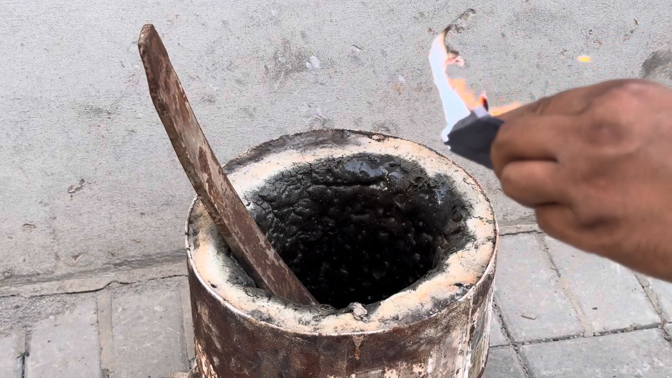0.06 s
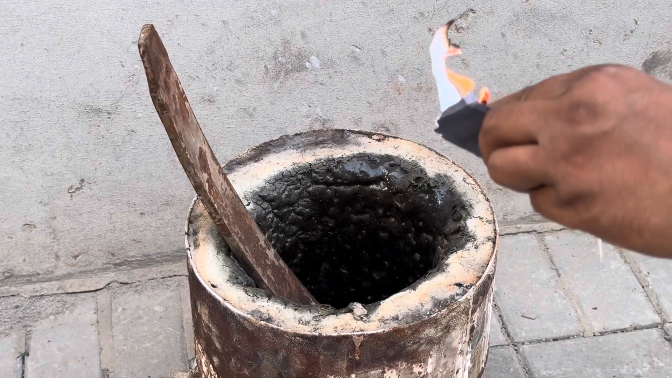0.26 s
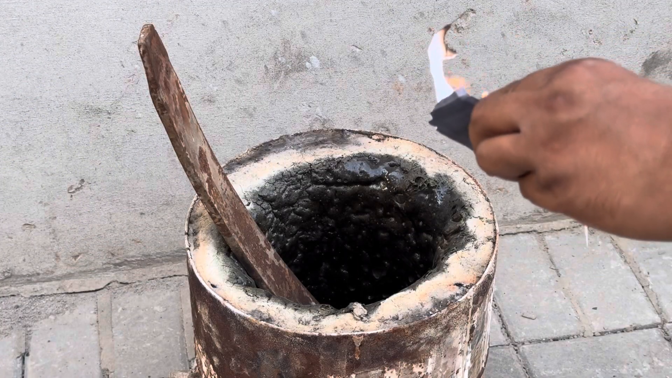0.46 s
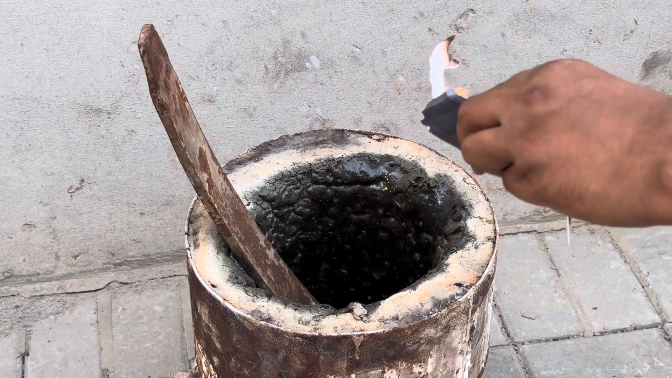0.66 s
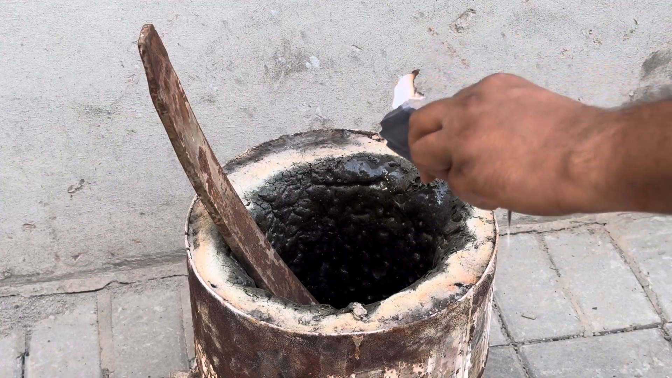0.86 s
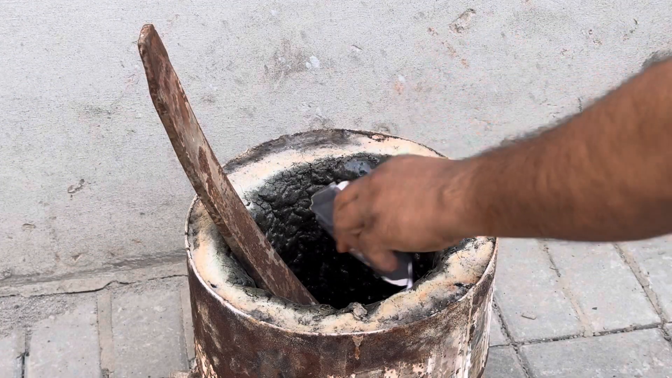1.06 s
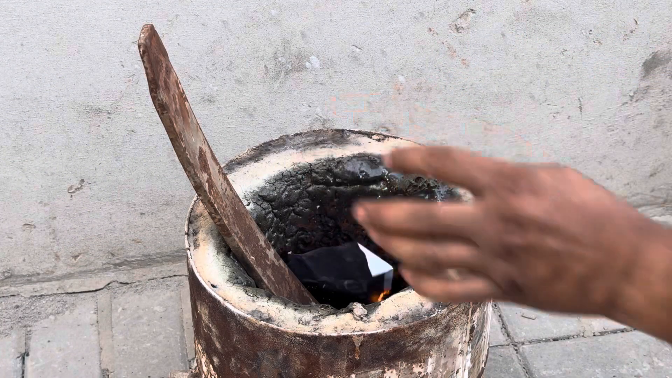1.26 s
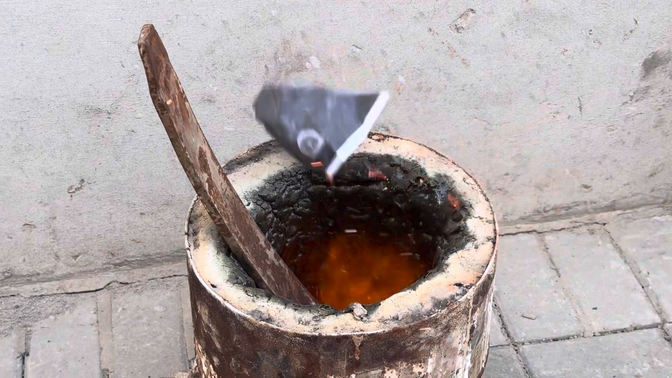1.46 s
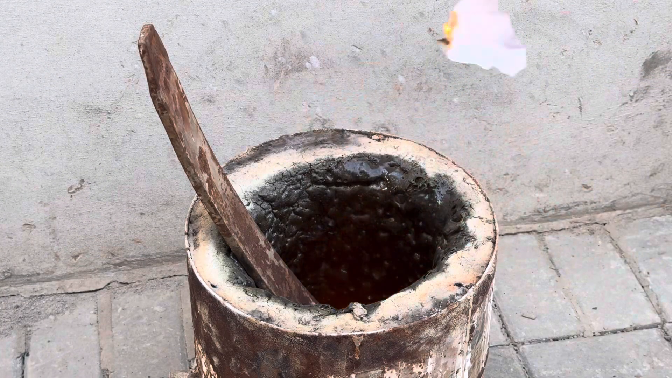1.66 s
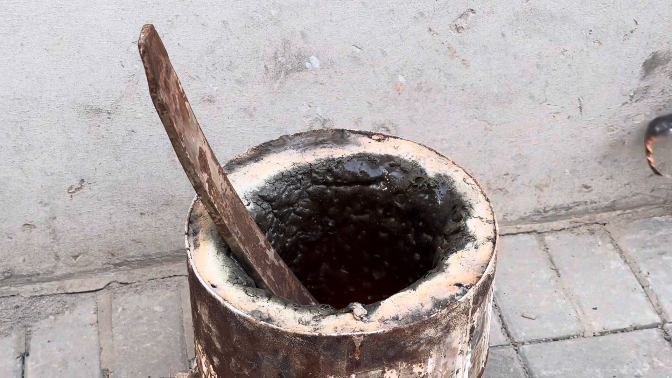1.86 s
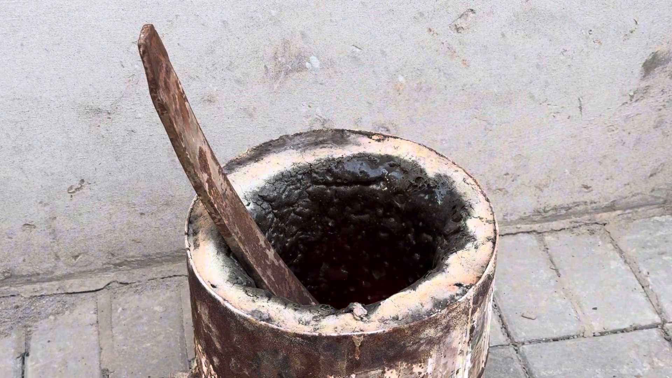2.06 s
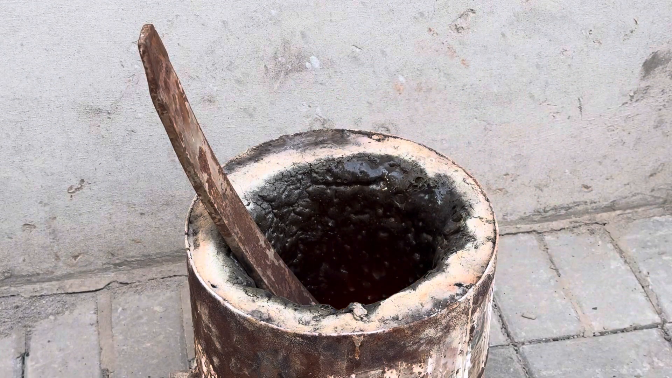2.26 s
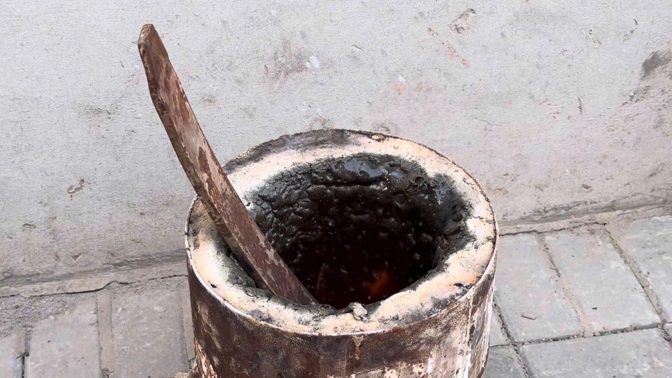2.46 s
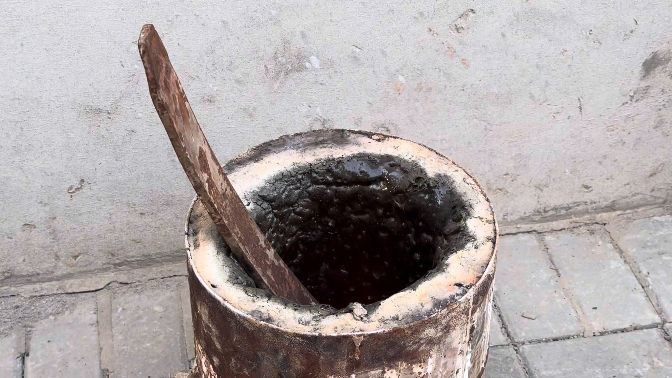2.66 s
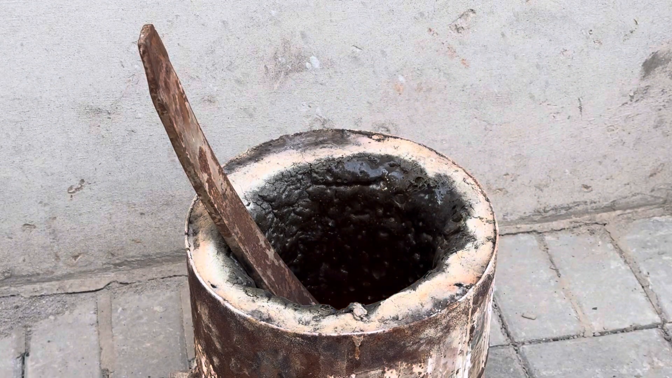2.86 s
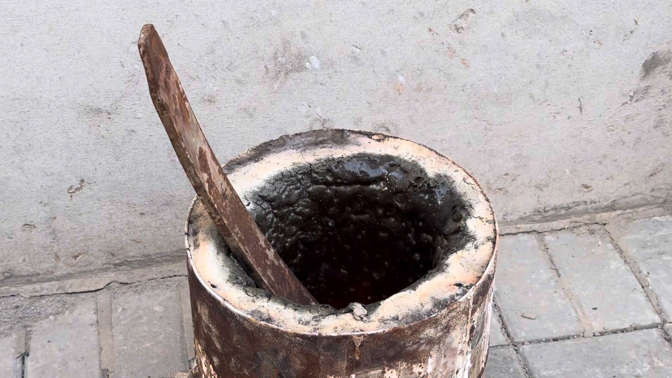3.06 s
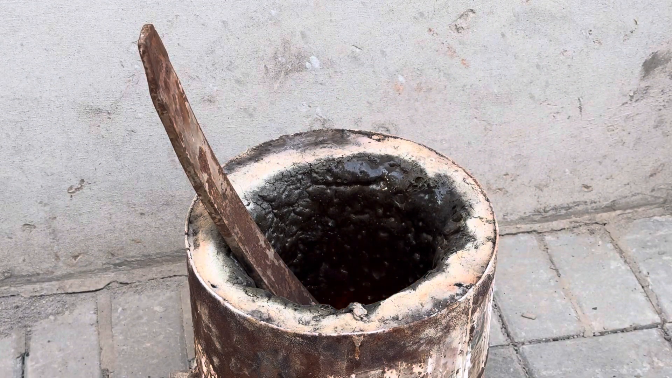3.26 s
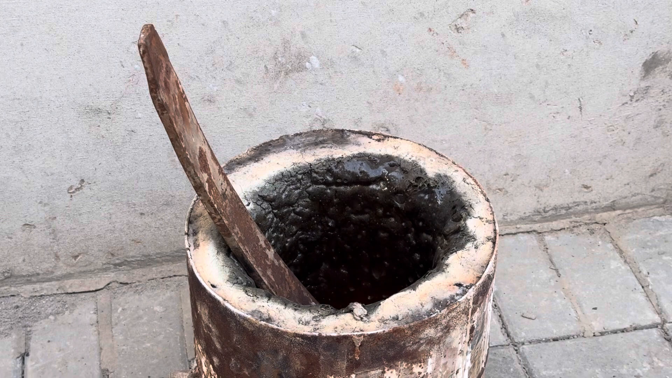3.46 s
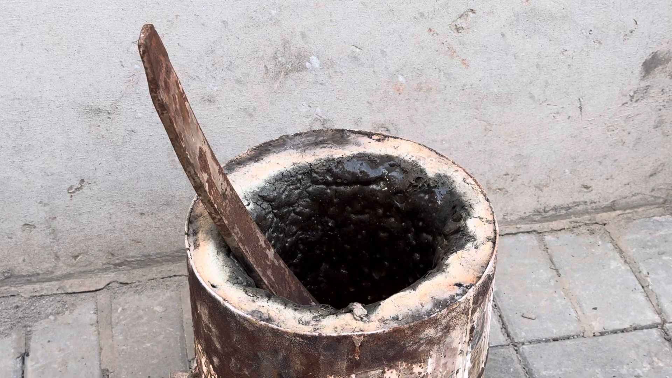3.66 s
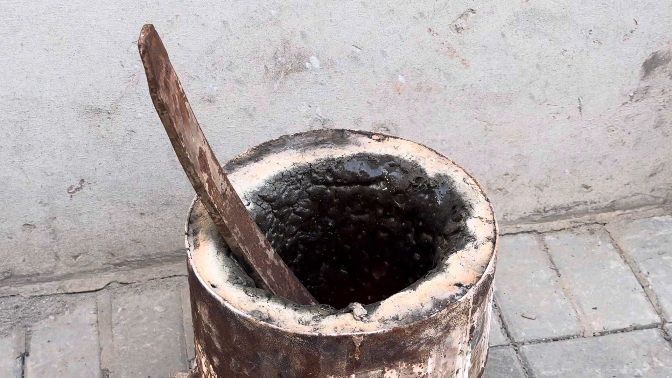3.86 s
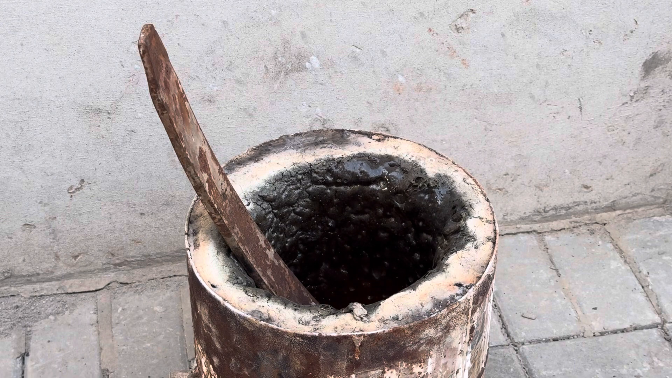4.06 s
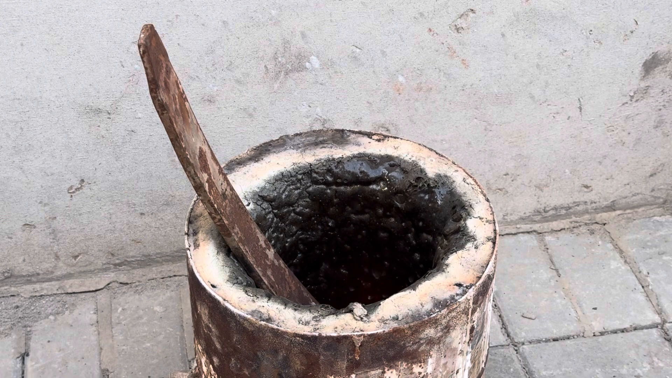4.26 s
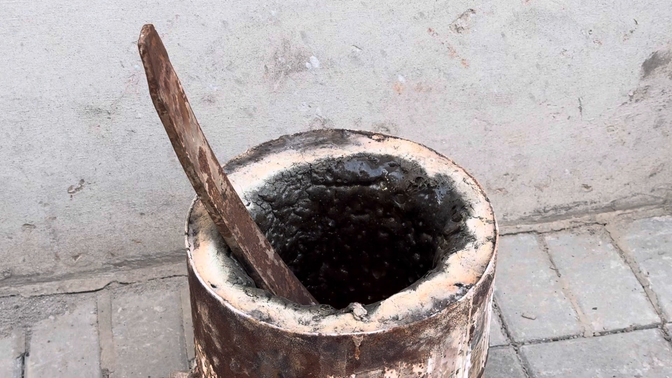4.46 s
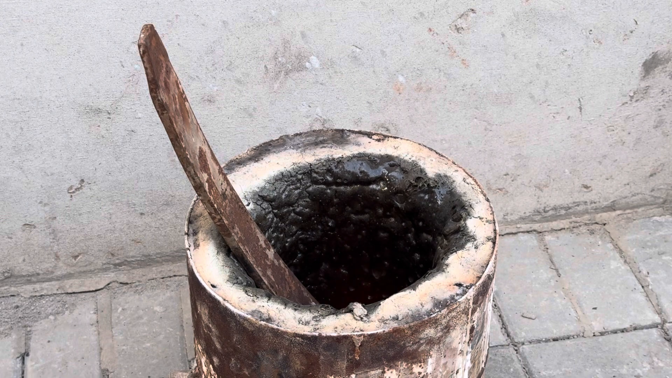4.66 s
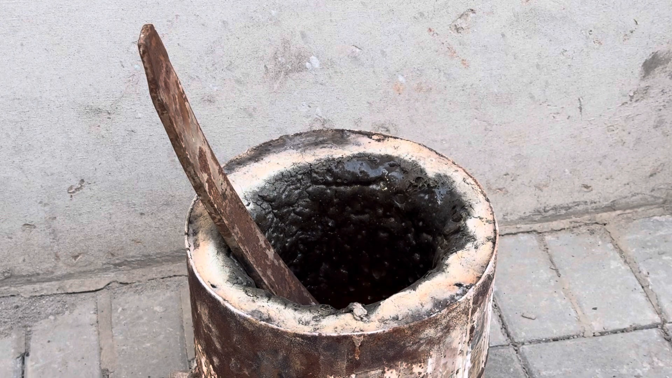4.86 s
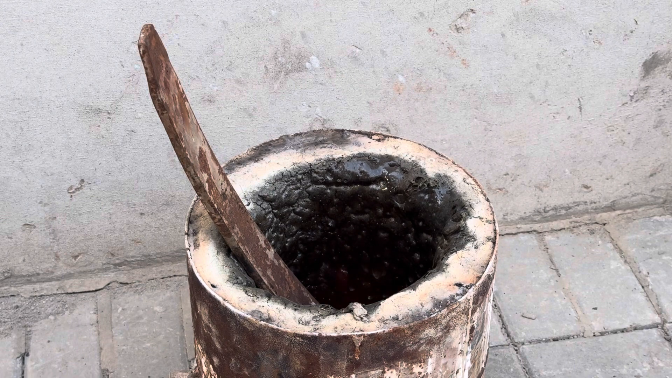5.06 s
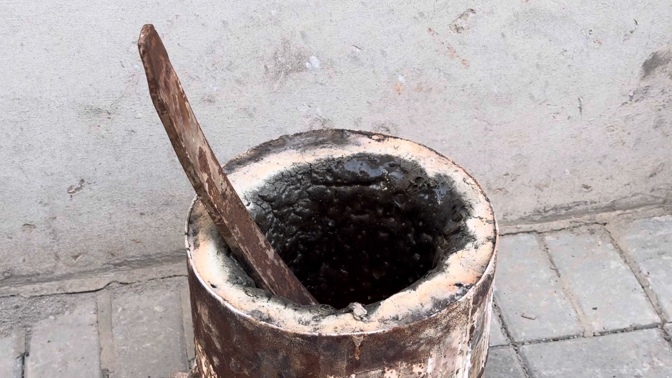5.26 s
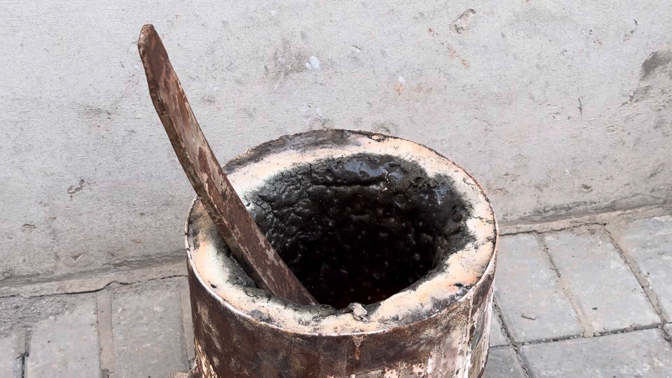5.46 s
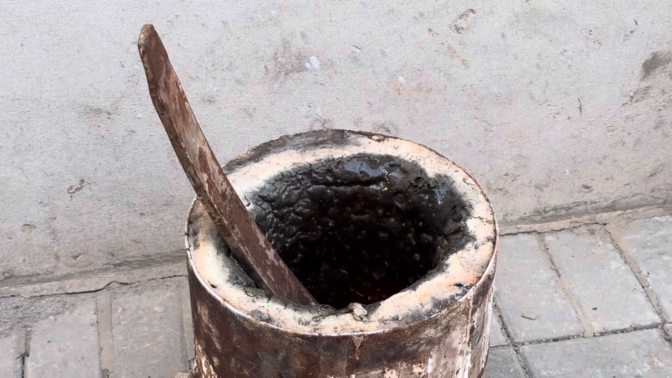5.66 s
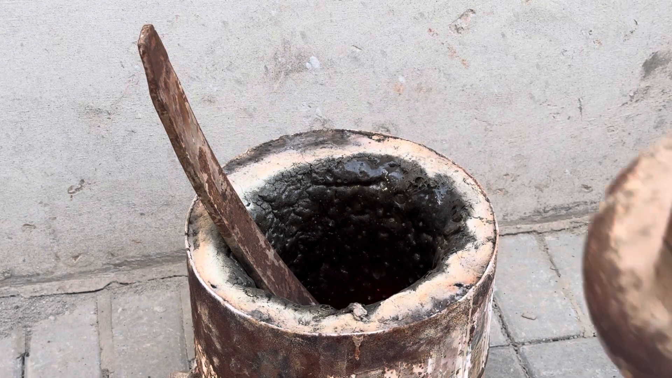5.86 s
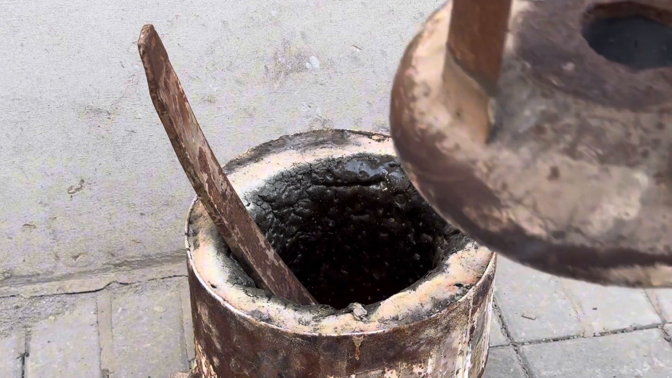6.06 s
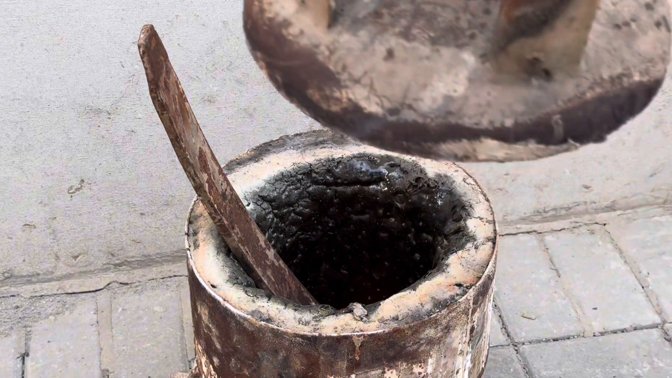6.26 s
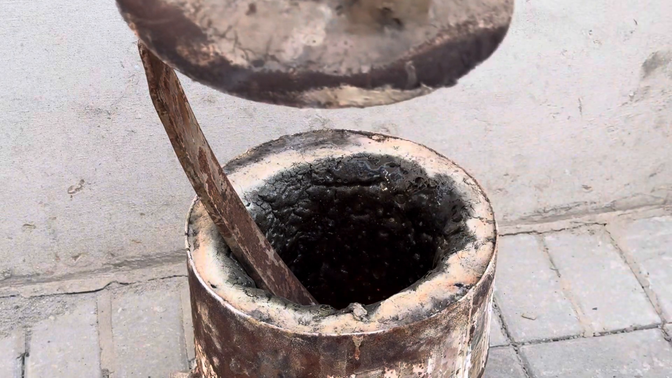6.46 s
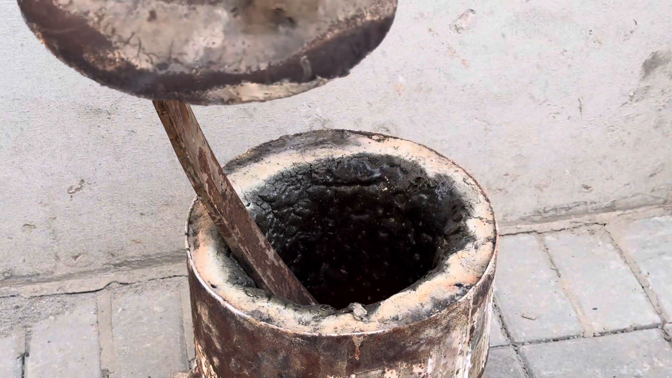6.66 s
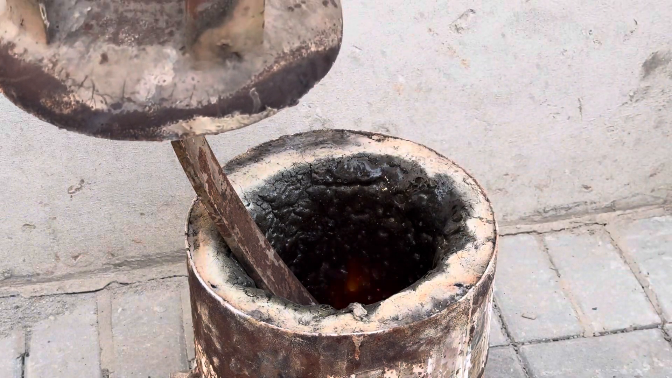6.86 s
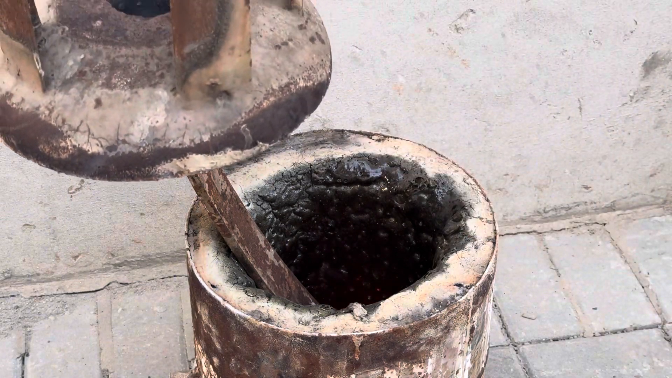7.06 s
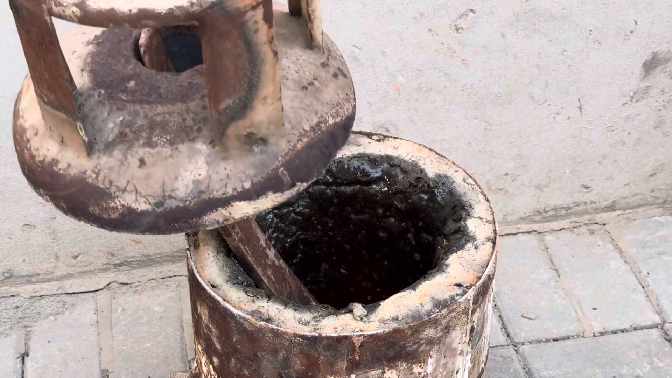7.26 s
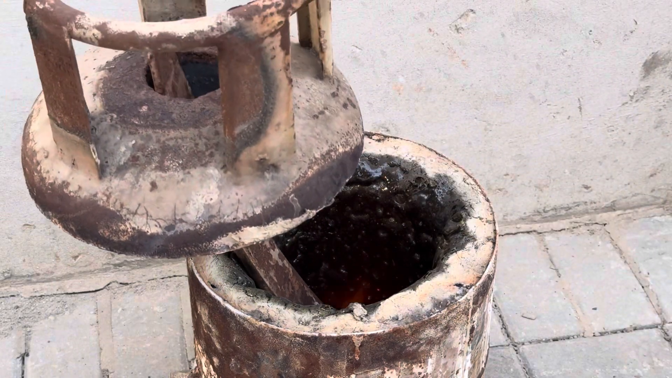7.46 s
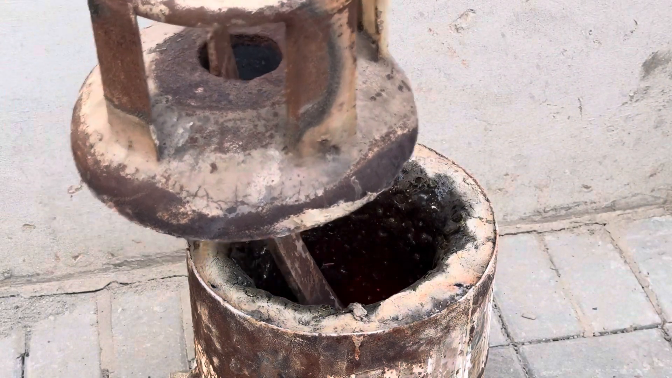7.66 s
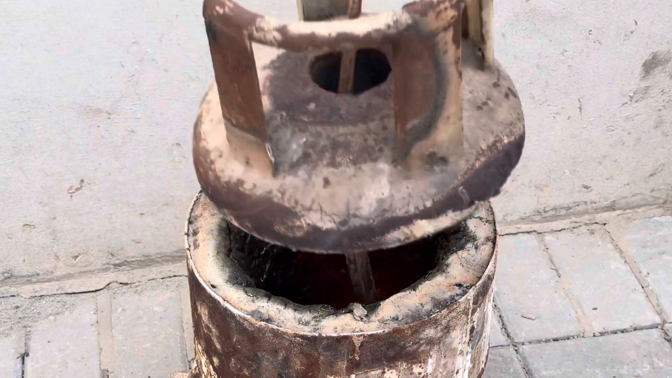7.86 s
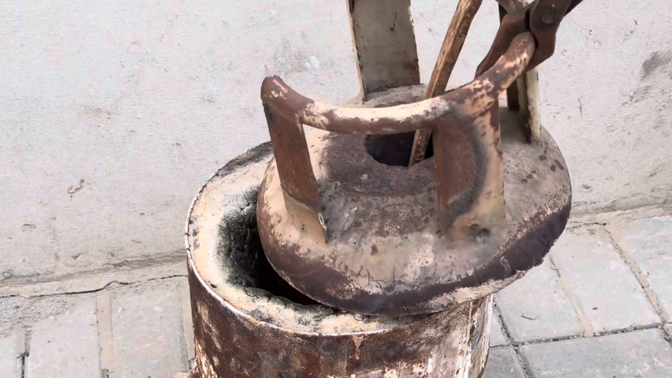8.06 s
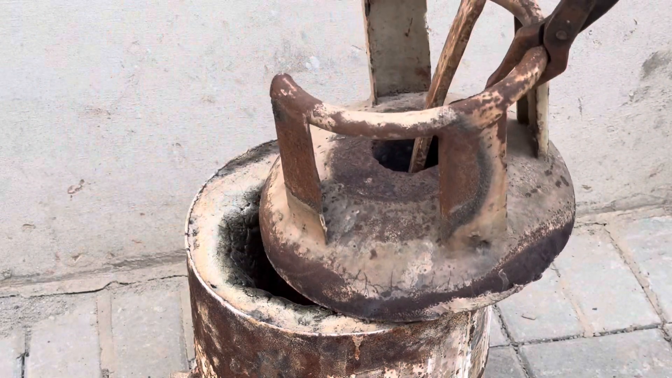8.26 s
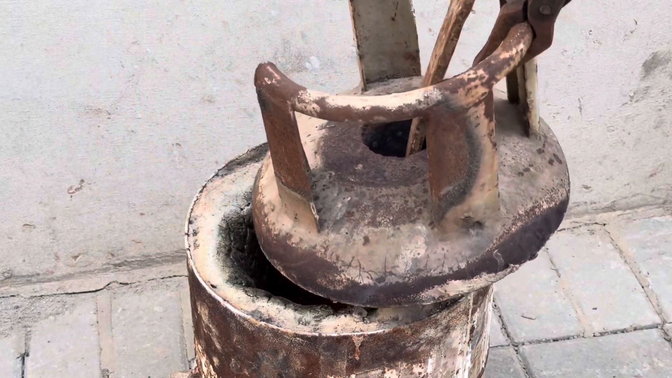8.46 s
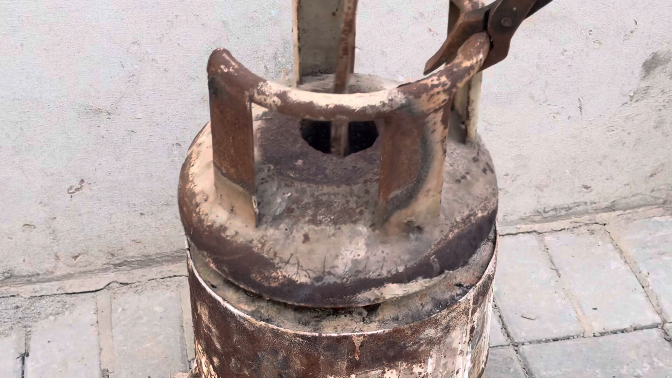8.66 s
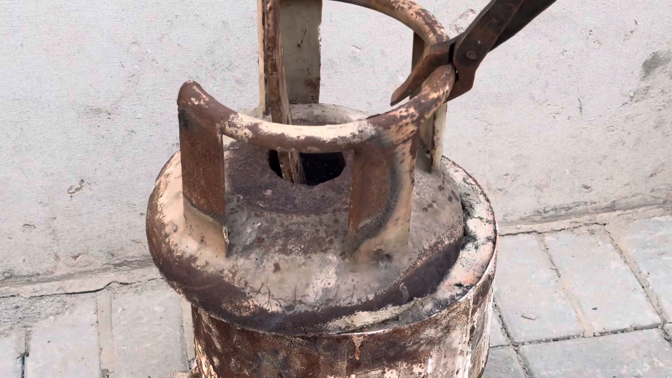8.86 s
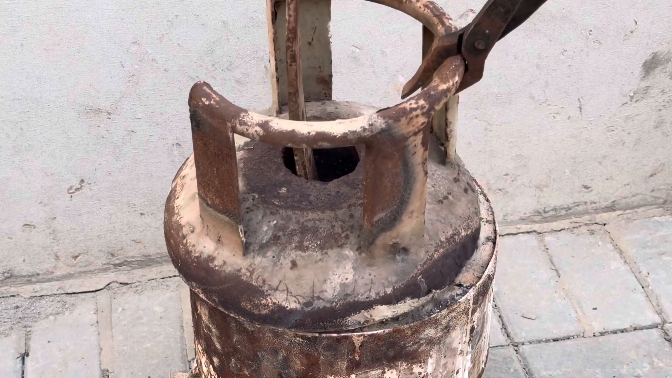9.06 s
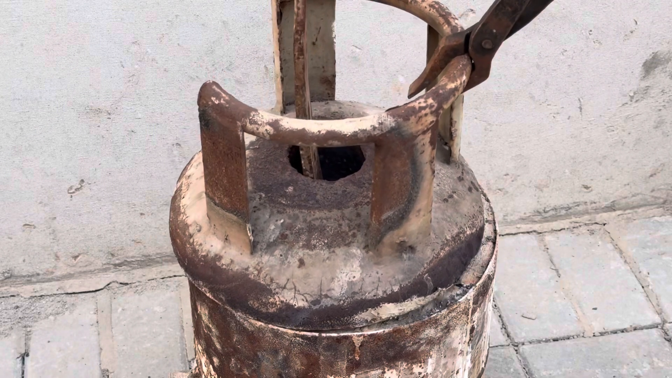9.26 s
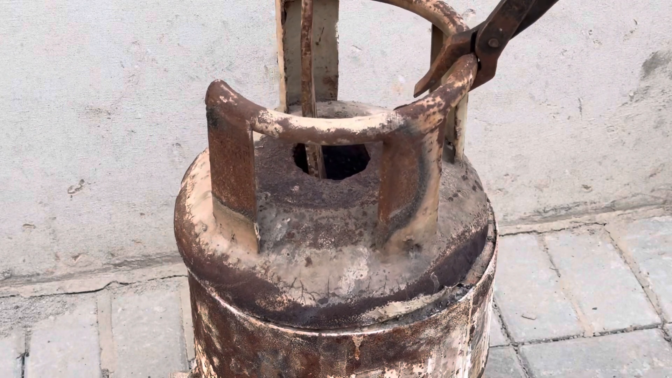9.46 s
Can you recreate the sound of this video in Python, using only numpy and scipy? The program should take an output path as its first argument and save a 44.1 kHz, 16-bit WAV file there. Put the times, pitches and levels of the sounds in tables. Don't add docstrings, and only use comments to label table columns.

```python
import sys
import numpy as np
from scipy import signal
from scipy.fft import rfft, irfft
from scipy.io import wavfile
from scipy.ndimage import uniform_filter1d

SR = 44100
rng = np.random.default_rng(int(sys.argv[2]) if len(sys.argv) > 2 else 0)


def store_wav(level_fs):
    pcm = np.round(np.clip(np.atleast_2d(level_fs), -1, 1) * 32767)
    wavfile.write(sys.argv[1], SR, pcm.T.astype(np.int16))


def elevation(decibels):
    levels = np.asarray(decibels, float)
    return 10 ** (levels / 20)


N = 419391
T = np.arange(N) / SR
LIT_S = 1.312

# (time [s], level #
# [dB])
FLOW = [(0.42, -64), (0.46, -61.5), (0.55, -50.5), (0.686, -45), (0.86, -40), (1.2, -36.5), (1.294, -36),
        (1.324, -44.5), (1.76, -45), (2.26, -50), (3.13, -50.5), (5.89, -53), (7.1, -54), (9.51, -54.5)]
# (time [s], treble [dB], left minus right [dB])
CARRY = [(5.6, -0.5, 1.1), (6.1, -1, -0.3), (6.4, 2.5, -0.5), (6.78, 3, -0.5), (6.9, -5.5, 0.3),
         (7.05, -0.5, -1), (7.58, -1, 0.2), (7.66, -3, -0.6), (9.51, -0.5, 0.5)]


def level(x, db):
    return x * elevation(db) / np.sqrt(np.mean(x ** 2))


def noise():
    return rng.standard_normal(N)


def track(table, before_db=-110.):
    s, *columns = np.transpose(table)
    return [np.interp(T, s, column, left=before_db) for column in columns]


def colour(x, points, skirt_db=-34.5):
    size = 8192
    hz, db = np.transpose(points)
    hz = np.r_[hz[0] / 1.5, hz, hz[-1] * 1.25]
    db = np.r_[db[0] + skirt_db, db, db[-1] + skirt_db]
    bins_hz = np.fft.rfftfreq(size, 1 / SR)
    log_gain = np.interp(np.log(bins_hz + 1), np.log(hz), db) * np.log(10) / 20
    cepstrum = irfft(log_gain)
    cepstrum[1:size // 2] *= 2
    cepstrum[size // 2 + 1:] = 0
    response = irfft(np.exp(rfft(cepstrum)))
    return signal.fftconvolve(x, response)[:len(x)]


def ring(x, hz, width_hz):
    return signal.lfilter(*signal.iirpeak(hz, hz / width_hz, fs=SR), x)


def ring_twice(x, hz, width_hz):
    return ring(ring(x, hz, width_hz), hz, width_hz)


def walk(rate_hz):
    hold = int(SR / rate_hz)
    steps = np.repeat(rng.standard_normal(N // hold + 1), hold)
    return 0.65 * uniform_filter1d(uniform_filter1d(steps, hold), hold)[:N]


def steady(x, span_s):
    span = int(span_s * SR)
    power = uniform_filter1d(uniform_filter1d(x ** 2, span), span)
    return x / np.sqrt(power + 1e-18)


def eddies(rate_hz, scatter_db, tail_s, share):
    kicks = (rng.random(N) < rate_hz / SR) * elevation(scatter_db * rng.exponential(size=N))
    puff = signal.lfilter([1], [1, -np.exp(-1 / (tail_s * SR))], kicks)
    return (1 + share * puff / np.mean(puff)) * noise()


def yard():
    # (frequency [Hz], level [dB per Hz])
    hum_colour = [(76, -29.5), (130, -7), (168, -7.5), (209, -3), (314, -13), (464, -13.5), (1050, -23),
                  (1350, -23), (1420, -25.5), (6020, -47.5), (7500, -48.5), (9750, -85), (16500, -120)]
    mid, side = (level(colour(elevation(2.6 * walk(5.6)) * noise(), hum_colour, skirt_db=-36.0), db)
                 for db in (-47.4, -54.5))
    low_pass = signal.butter(8, 1600., fs=SR, output="sos")
    return mid, signal.sosfilt(low_pass, side)


def wind():
    # (time [s], peak [dB], rise and fall [dB per s])
    gusts = [
        (0.292, -21, 600),
        (0.377, -30.5, 300),
        (0.47, -32.5, 125),
        (0.636, -26.5, 596),
        (1.02, -30.5, 200),
        (1.092, -23, 696),
        (1.17, -25.5, 305),
    ]
    # (frequency [Hz], level [dB per Hz])
    thud_colour = [(12, -38.5), (20, -8), (59, -9), (80, -5), (97, -11), (162, -37), (200, -44.5),
                   (260, -66), (440, -120)]
    peaks = [db - slope * np.abs(T - s) for s, db, slope in gusts]
    breeze_db = np.where(T < LIT_S, -44, -60.5)
    gust_db = np.max(peaks + [breeze_db], axis=0)
    return [steady(colour(noise(), thud_colour), 0.027) * elevation(gust_db + db) for db in (0.1, -12.0)]


def echo(forge):
    # (frequency [Hz], gain [dB])
    walls = [(40, -23.5), (110, -37), (200, -9), (380, -17.5), (700, -11), (1300, -20), (1600, -19),
             (1900, -37), (2800, -22), (6000, -31.5)]
    shimmer = np.array([walk(9.1) for _ in range(6)])
    shimmer /= np.sqrt(np.sum(shimmer ** 2, axis=0))
    lags = rng.integers(100, 1200, size=6)
    copies = sum(np.roll(forge, lag) * weight for lag, weight in zip(lags, shimmer))
    return colour(copies, walls)


def ticks():
    # (time [s], peak [dB], pitch [Hz], 60 dB decay [s])
    tick_events = [(0.016, -51, 5150, 0.018), (0.047, -41, 4300, .03), (0.048, -43, 2000, 0.06),
                   (0.804, -26, 4800, 0.025), (0.872, -31, 1050, .04), (0.954, -30, 1700, .03),
                   (1.024, -28, 2100, .04), (1.025, -30, 4500, .03), (1.301, -18.5, 1700, 0.06),
                   (1.308, -17.5, 1280, 0.022), (1.308, -29, 4500, 0.036)]
    out = np.zeros(N)
    t = np.arange(int(0.1 * SR)) / SR
    for s, db, hz, t60 in tick_events:
        decay = np.exp(-np.log(1000) * t / t60)
        burst = ring(rng.standard_normal(len(t)), hz, 0.23 * hz) * decay
        out[int(s * SR):][:len(t)] += elevation(db) * burst / np.max(np.abs(burst))
    return out


def valve():
    start_s, hold_s, edge_db_per_s = 0.47, 0.13, 600.
    squeal = ring(ring(noise(), 6600.0, 500.), 6000.0, 500.)
    t = T - start_s
    outside_s = np.clip(np.maximum(-t, t - hold_s), 0, 1)
    return level(squeal, 0.1) * elevation(-57.5 - edge_db_per_s * outside_s)


def stall_db():
    late = (T - LIT_S) / 0.071
    return -5.5 * (late > 0) * np.clip(1 - late ** 4, 0, 1)


def drone():
    air = noise()
    note = ring(ring(air, 639.0, 57.0), 631.0, 62.0)
    note = note + elevation(-12.5) * ring_twice(air, 536.0, 92.0)
    flutter = level(ring(air, 280., 250.), -16.0)
    full_flow_db = -36
    cold_db = -31.5 + 1.55 * (track(FLOW)[0] - full_flow_db)
    lit_db = -44.5
    return (steady(note, 0.12) + flutter) * elevation(np.where(T < LIT_S, cold_db, lit_db))


def jet():
    # (frequency [Hz], width [Hz], level [dB])
    tube_modes = [(1453, 63, 3), (1824, 210, -16), (2347, 71, -9.5), (2786, 118, 0), (2922, 168, -0.5),
                  (4130, 260, -16), (4790, 250, -15.5), (6760, 170, -15.5)]
    # (frequency [Hz], level [dB per Hz])
    nozzle = [(300, -33.5), (1000, -25), (2500, -10.5), (3100, -7.5), (3450, -26.5), (3800, -8.5),
              (5000, -14.5), (7000, -4), (9000, -2), (12000, -12), (12800, -8.5), (13400, -12),
              (15500, -11.5), (16000, -1.5)]
    port_lag_s, side_from_hz, side_top_hz = 5.8e-5, 6970, 13900
    hiss_db = track(FLOW)[0]
    weak_db = np.minimum(hiss_db + 49, 0) * (T < LIT_S)
    tube_db = hiss_db - 0.7 + 2 * weak_db + stall_db()

    flow = elevation(0.88 * walk(11) + 0.5 * walk(40))
    air = flow * eddies(300, 0.85, 0.0034, share=0.13)
    tube = sum(elevation(db) * ring_twice(air, hz, 1.46 * width) for hz, width, db in tube_modes)

    stray = flow * noise()
    hiss, other = (rfft(level(colour(x, nozzle), 9.4) * elevation(hiss_db)) for x in (air, air + 1.2 * stray))
    hz = np.fft.rfftfreq(N, 1 / SR)
    turn = np.pi * hz * port_lag_s
    band = 1 / (1 + (side_from_hz / (hz + 1)) ** 40) / (1 + (hz / side_top_hz) ** 60)
    tilt = (hz / 10200.0) ** 1.8
    mid = irfft(hiss * np.cos(turn), N)
    side = irfft(-1j * other * np.sin(turn) * band * tilt, N)
    return level(tube, 0.86) * elevation(tube_db) + mid, side * elevation(-6.0)


def blast():
    # (time [s], level [dB], pitch [Hz], length [cycles])
    swings = [
        (0.76, -27.5, 131, 0.88),
        (1.296, -5.5, 76, 2.2),
        (1.312, -5.5, 62, 1.5),
        (1.303, -16, 140, 1),
        (1.318, -6.5, 151, 3.8),
        (1.316, -14.5, 350, 2.3),
        (1.338, -1.5, 340, 1.5),
        (1.347, -4, 480, 2.2),
    ]
    out = np.zeros(N)
    t = np.arange(int(0.2 * SR)) / SR
    for s, db, hz, cycles in swings:
        rise = 1 - np.exp(-6.0 * hz * t)
        fall = np.exp(-(hz * t / cycles) ** 2 * 2)
        out[int(s * SR):][:len(t)] += elevation(db) * np.sin(2 * np.pi * hz * t) * rise * fall
    return out


def pot_modes(x):
    # (frequency [Hz], width [Hz], level [dB])
    modes = [(283, 36, -7.5), (348, 24, -1), (422.4, 31.5, -3), (940, 51, -2.5), (2720, 360, -4),
             (3764, 39, 4.5), (4730, 82, -5)]
    return x + sum(elevation(db) * ring(x, hz, width) for hz, width, db in modes)


def flame_rumble(lid, catch_db):
    # (frequency [Hz], level [dB per Hz])
    rumble_colour = [(13, -71.5), (22, -50), (36, -18.5), (69, -5), (91, 0.5), (151, 1), (215, -11),
                     (280, -21), (470, -120)]
    kick_db = 4 * np.exp(-(np.maximum(T - LIT_S, 0) / 0.024) ** 2)
    rumble_db = track(FLOW)[0] + 23.5 - 0.5 * lid + 2 * walk(8) + kick_db + catch_db
    rumble = steady(colour(noise(), rumble_colour), 0.089)
    return rumble * elevation(np.minimum(rumble_db, -17))


def flame_rush(lid, catch_db, surge):
    # (frequency [Hz], level [dB per Hz])
    rush_open = [(1180, -49.5), (2000, -31), (2210, -0.5), (2400, -2), (2720, -14), (3020, -8.5), (3250, 4),
                 (3760, -2), (4090, -6.5), (4810, 0), (6250, -6.5), (6870, -8.5), (7600, -15.5),
                 (9880, -61.5), (16700, -120)]
    rush_covered = [(1000, -42), (1700, -14), (1860, -19.5), (2050, -23), (2240, 7.5), (2520, 0.5),
                    (2840, -5), (3030, -7), (3220, -22.5), (3990, -6), (5770, -22.5), (6830, 0),
                    (7600, -10.5), (9880, -51), (16700, -120)]
    rush_db = track(FLOW)[0] + 3 - 6.5 * lid + 3 * walk(9) + stall_db() + catch_db
    flare_db = 1.5 / (1 + np.exp(np.minimum((T - 2.1) / 0.03, 50)))
    rush_db = rush_db + track(CARRY, before_db=0)[0] + flare_db
    rush = elevation(0.35 * surge + 0.48 * walk(25)) * eddies(360, 2.4, 0.0041, share=0.23)
    rush = pot_modes(rush)
    fizz = sum(weight ** 0.43 * level(colour(rush, points), 1.5)
               for weight, points in ((1 - lid, rush_open), (lid, rush_covered)))
    return steady(fizz, 0.33) * elevation(rush_db + 0.5)


def flame_roar(lid, catch_db, surge):
    # (time [s], level [dB])
    burn_curve = [(1.312, -9), (1.376, -12.5), (1.41, -11), (2.0, -14), (2.1, -15.5), (2.94, -19),
                  (3.5, -19), (4.22, -19.5), (4.5, -18), (6.1, -21), (6.6, -21), (6.9, -19.5), (7.0, -20.5),
                  (8.23, -21.5), (8.43, -17.5), (8.72, -20.5), (9.1, -19.5), (9.51, -20.5)]
    # (time [s], peak [dB])
    pop_events = [(1.578, -0.5), (1.786, -9.5), (1.906, -7), (2.138, -4), (2.18, -6), (2.336, -4.5),
                  (2.585, -15), (2.713, -10), (2.976, -10), (3.376, -11), (3.447, -7.5), (3.544, -10.5),
                  (3.733, -14.5), (3.893, -14), (4.503, -9.5), (4.891, -14), (5.232, -10), (5.323, -10.5),
                  (6.245, -16.5), (6.481, -12.5), (7.349, -8.5), (7.476, -12), (7.527, -10.5), (7.636, -10),
                  (7.945, -10.5), (8.145, -11), (8.337, -14), (8.537, -8.5), (8.656, -12.5), (9.096, -6)]
    # (frequency [Hz], level [dB per Hz])
    pot_open = [(110, -61), (190, -16), (214, -25.5), (259, -4.5), (302, -5.5), (337, -2), (425, -2.5),
                (541, -5.5), (784, -28.5), (959, -27.5), (1200, -28.5), (1320, -42), (1480, -29.5),
                (1940, -46.5), (2100, -43.5), (2730, -69), (4620, -120)]
    pot_half = [(110, -38.5), (190, -9.5), (217, -20.5), (262, -1.5), (308, -4.5), (344, 0.5), (373, -7.5),
                (438, -7.5), (484, -14), (738, -21), (824, -41.5), (1040, -25.5), (1510, -44.5),
                (1820, -62), (2100, -51.5), (2730, -86.5), (4620, -120)]
    pot_covered = [(110, -39), (190, -1.5), (217, -20), (276, 5), (447, -28), (514, -22), (557, -12),
                   (695, -44), (876, -38), (978, -36), (1160, -24), (1320, -47), (1510, -33.5), (1600, -64),
                   (2100, -86), (2730, -85), (4620, -120)]
    strength_db = track(burn_curve, before_db=burn_curve[0][1])[0]
    roar_db = strength_db - 6.5 * lid + 1.54 * walk(9) + catch_db
    burn = elevation(0.5 * surge) * eddies(60, 3.7, 0.011, share=0.077)
    pop_s, pop_db = np.transpose(pop_events)
    at = (pop_s * SR).astype(int)
    pops = np.zeros(N)
    pops[at] = elevation(pop_db - roar_db[at] + 21.0)
    burn = pot_modes(burn + uniform_filter1d(pops, size=36))
    stages = np.clip(1 - np.abs(2 * lid - np.arange(3)[:, None]), 0, 1)
    roar = sum(weight * level(colour(burn, points), 0.1)
               for weight, points in zip(stages, (pot_open, pot_half, pot_covered)))
    return steady(roar, 0.15) * elevation(roar_db)


def flame():
    # (time [s], mouth covered [0-1])
    lid_curve = [
        (0, 0.14),
        (6.6, 0),
        (7.6, 0.11),
        (8.0, 0.38),
        (8.6, 0.43),
        (9.0, 0.72),
        (9.51, 0.83),
    ]
    lid = np.clip(track(lid_curve)[0], 0, 1)
    catch_db = -520. * np.maximum(LIT_S - T, 0)
    surge = walk(17)
    return flame_roar(lid, catch_db, surge) + flame_rumble(lid, catch_db) + flame_rush(lid, catch_db, surge)


def scene():
    hum, hum_side = yard()
    gust, gust_side = wind()
    gas, gas_side = jet()
    forge = gas + drone() + flame() + blast() + ticks() + valve()
    mid = forge + gust + hum
    side = gas_side + echo(forge) + gust_side + hum_side
    tilt = elevation(track(CARRY, before_db=0)[1] / 2)
    return np.array([(mid + side) * tilt, (mid - side) / tilt])


def top_cut(x):
    return signal.sosfilt(signal.butter(12, 16380, fs=SR, output="sos"), x)


def record(dry):
    # (frequency [Hz], gain [dB])
    sum_colour = [(10, -22), (30, -6), (50, 0), (7550, 0), (7700, -45), (9150, -45), (9350, -12), (9800, 0),
                  (15650, 0), (15750, -60)]
    left, right = np.tanh(0.81 * dry) / 0.77
    hz = np.fft.rfftfreq(N, 1 / SR)
    gain = elevation(np.interp(hz, *np.transpose(sum_colour)))
    mid = irfft(rfft(left + right) / 2 * gain, N)
    side = (left - right) / 2
    return top_cut(np.array([mid + side, mid - side]))


dry = scene()
out = record(dry)
store_wav(out)
```